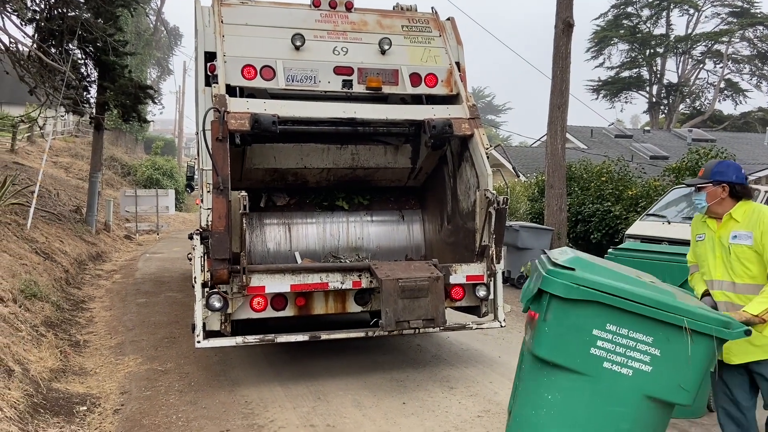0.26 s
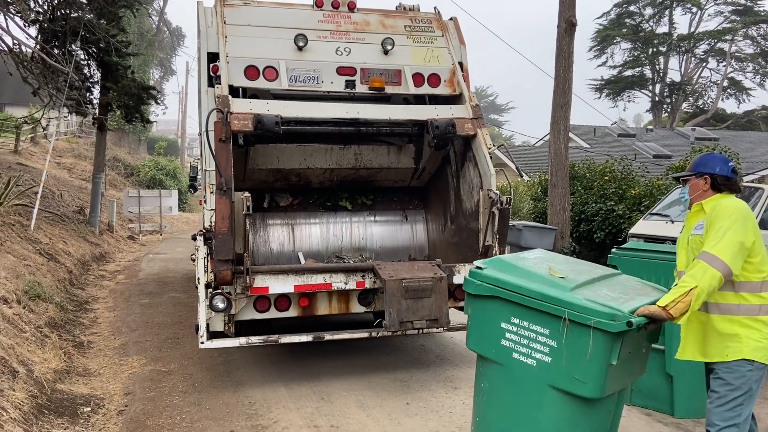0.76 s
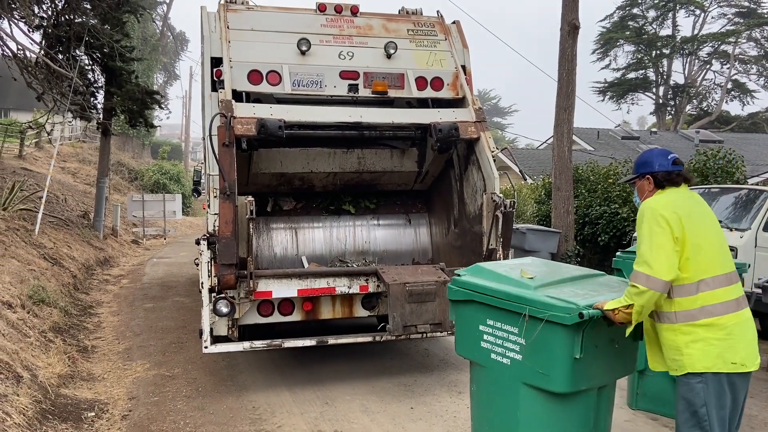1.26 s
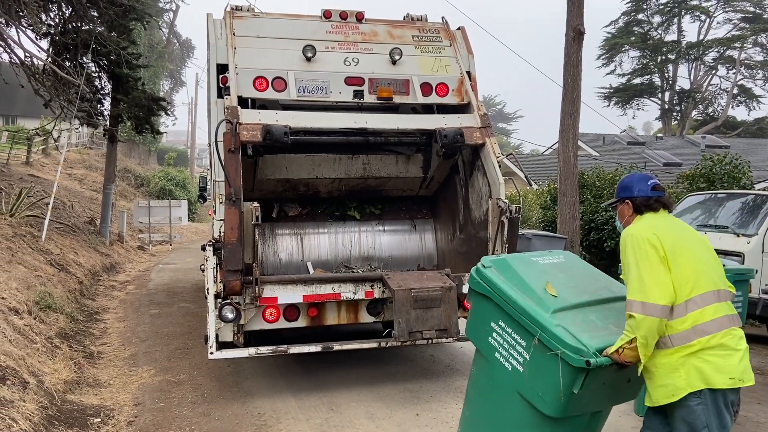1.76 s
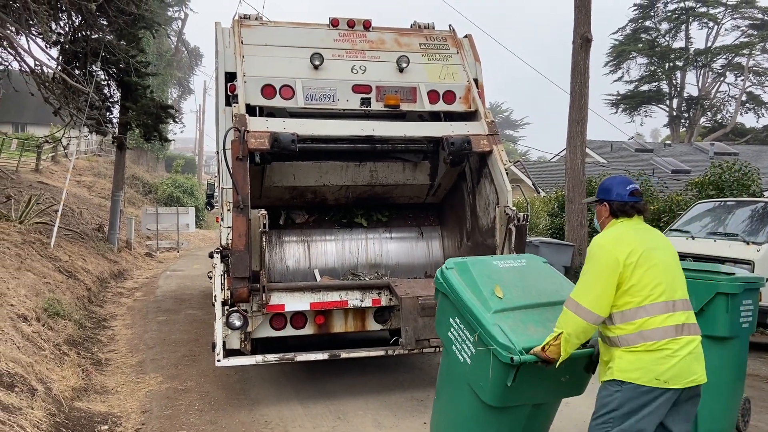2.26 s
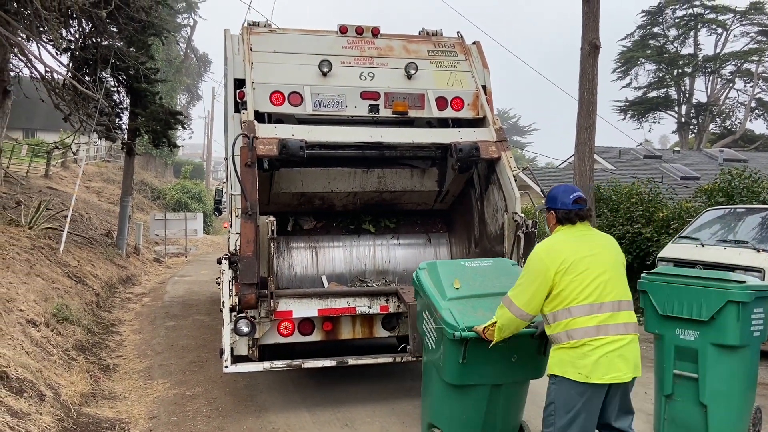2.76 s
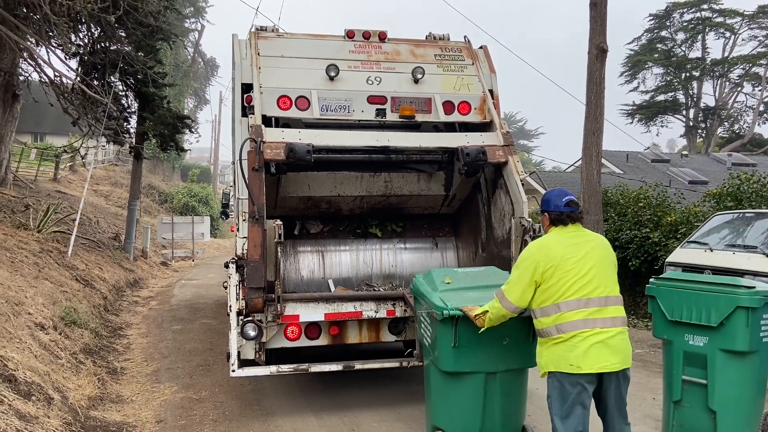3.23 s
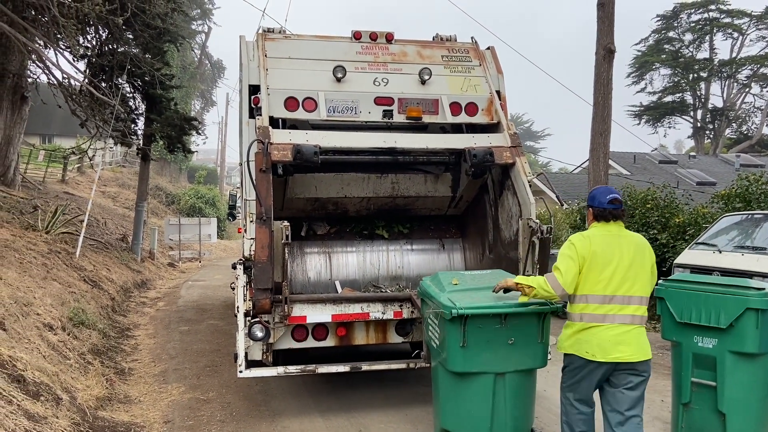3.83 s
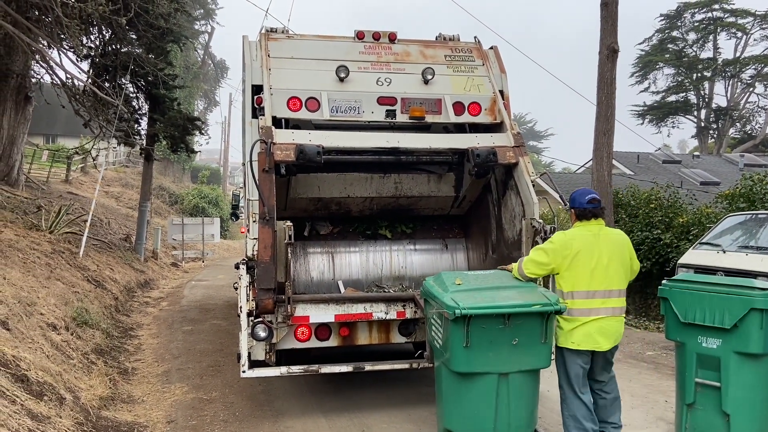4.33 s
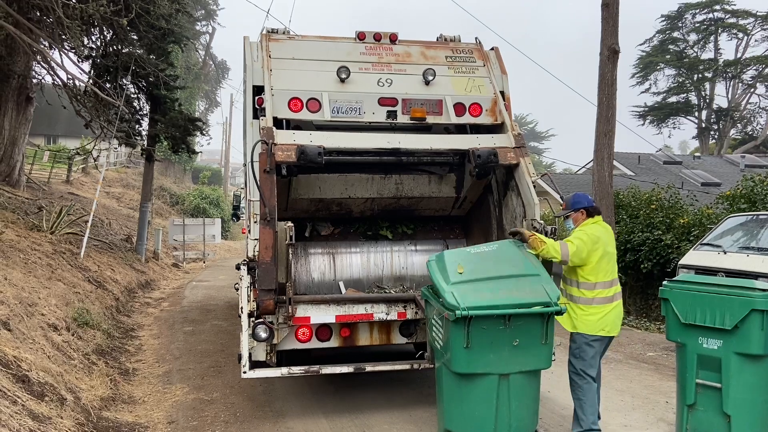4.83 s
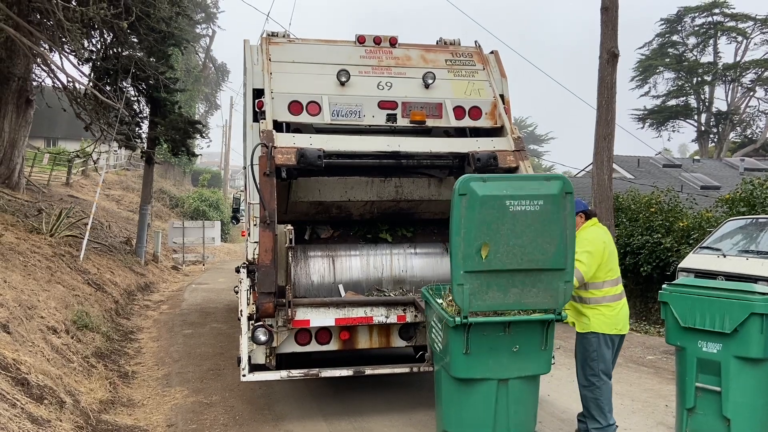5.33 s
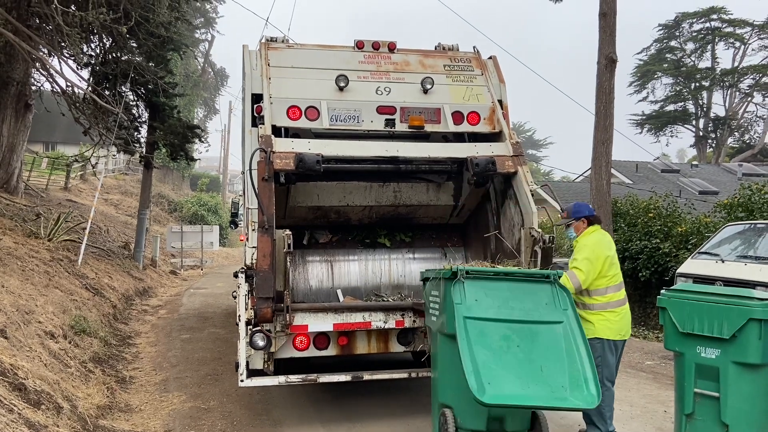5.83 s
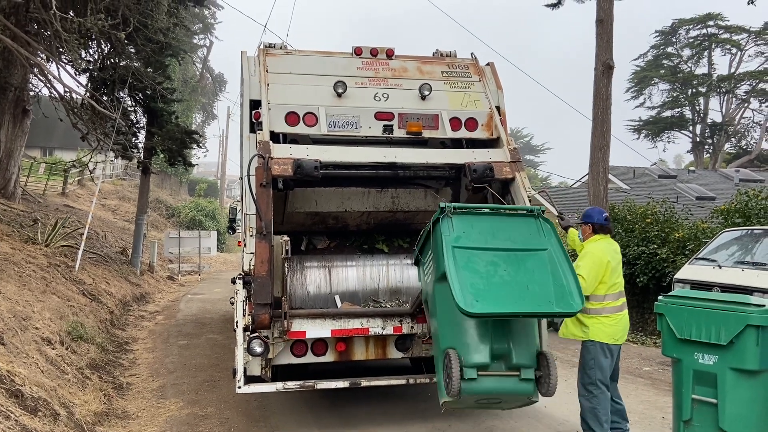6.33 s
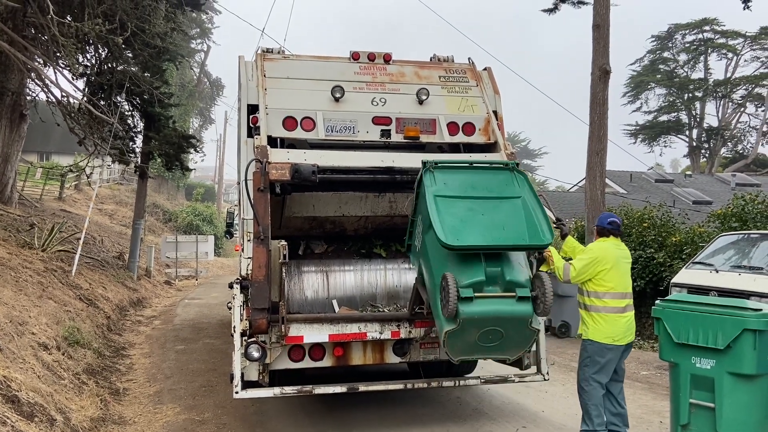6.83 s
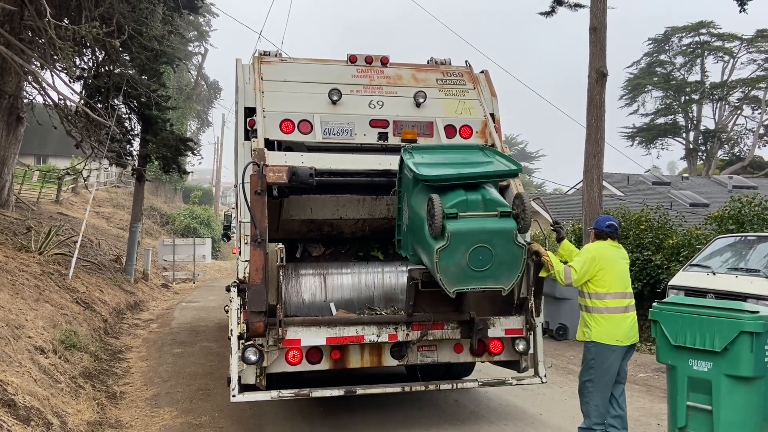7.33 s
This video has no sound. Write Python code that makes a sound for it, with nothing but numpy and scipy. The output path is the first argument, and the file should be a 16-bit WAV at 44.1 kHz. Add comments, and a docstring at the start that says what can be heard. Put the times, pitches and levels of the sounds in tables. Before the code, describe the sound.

A garbage truck's diesel idles throughout with low throb, clattering knock and fan noise. Close by, a plastic cart is rolled over grit with sharp snaps, then bumps hollowly against the truck. Its lid flips with light taps and slaps loudly on its back. A steel lifter clanks and bounces, the load knocks twice, and air bursts out with a squealing hiss. Outdoor street, stereo microphone a few metres back, short echo.

```python
"""A six-cylinder diesel idles in a street while a plastic cart is wheeled over grit to a garbage truck's tail.
The engine is shaped noise fired per cylinder plus tones; the grit is scattered noise grains and single snaps.
The cart bumps the truck and its lid slaps its back; then the steel lifter clanks: ringing modes over noise bursts.
Oil hisses, the load knocks hollowly twice, and a valve lets out air: shaped noise with whistles and squeals.
The street adds a decaying noise echo, and a limiter holds the level down after the loudest peaks."""
import sys
import numpy as np
from scipy import signal
from scipy.fft import rfft, irfft, next_fast_len
from scipy.io import wavfile
from scipy.ndimage import uniform_filter1d, minimum_filter1d, map_coordinates

SR = 44100
rng = np.random.default_rng(int(sys.argv[2]) if len(sys.argv) > 2 else 0)


def digitize_waveform(pressure):
    """Quantize a signal to 16-bit integers and store it at the path in sys.argv[1].

    Rows of a 2-D input are taken as channels; values are limited to [-1, 1].
    """
    field = np.atleast_2d(pressure).T
    bounded = np.clip(field, -1, 1)
    quanta = np.round(bounded * 32767).astype(np.int16)
    wavfile.write(sys.argv[1], SR, quanta)


N = 334278
TIME = np.arange(N) / SR
AGE = TIME[:SR // 2]  # seconds since a contact

# All noise spectra below are relative: (frequency [Hz], level [dB per Hz])

# Unequal knock of the six cylinders, in firing order: (level [dB])
CYLINDER_LEVELS = [3, -1, 4, 0, -5, 0]
# Engine and pump tones, mean level before a slow waver: (multiple of cycle rate [1], level [dB])
ENGINE_TONES = [(6, -47.5), (12, -36.5), (13, -42.5), (14, -42.5), (18, -39.5), (22.6, -38), (31, -46),
                (39.85, -42), (56, -49), (60, -51.5), (79.7, -51.5), (127, -54.5), (171, -56.5),
                (213.4, -55)]
# Engine loudness before the trims in engine(): (time [s], exhaust [dB], clatter [dB], pump [dB])
IDLE_LEVELS = [(0, -32.5, -37, -58.5), (2.2, -33.5, -36.5, -56.5), (3.6, -33.5, -37.5, -59.5),
               (6.2, -29.5, -36, -57.5), (7.58, -30.5, -34.5, -57)]
# Spectrum of the exhaust throb: (frequency [Hz], level [dB per Hz])
EXHAUST_SPECTRUM = [(20, -45), (32, -11), (47, -14), (60, 0.5), (105, 0.5), (140, -2.5), (290, -2.5),
                    (370, -11), (480, -17.5), (800, -23), (2000, -80)]
# Spectrum of the diesel knock: (frequency [Hz], level [dB per Hz])
CLATTER_SPECTRUM = [(250, -26), (500, -15), (650, -1), (740, -7), (860, 3), (1000, -3), (1250, -9),
                    (1700, -26), (2030, -18), (2500, -21), (5000, -35), (16000, -52)]
# Spectrum of the cooling fan: (frequency [Hz], level [dB per Hz])
FAN_SPECTRUM = [(200, -7), (500, -6.5), (850, 1), (1200, -4), (1700, -11), (3000, -15), (4200, -17.5),
                (5200, -26.5), (7000, -25), (11000, -38), (16000, -37)]
# Spectrum of a loose panel: (frequency [Hz], level [dB per Hz])
RATTLE_SPECTRUM = [(1100, -7), (1500, 17), (2030, 10), (2400, 5), (3200, -35), (8000, -70)]
# Spectrum of the hydraulic pump: (frequency [Hz], level [dB per Hz])
PUMP_SPECTRUM = [(2900, -30), (3450, -3), (3780, 10), (4050, -3), (4250, -2), (4370, 7), (4550, -8),
                 (5000, -27), (9000, -72)]
CYCLE_HZ = 5
KNOCK_DB, FAN_DB, CLATTER_TRIM_DB = -1, 1.2, -4.5  # knock and fan re the trimmed clatter level
KNOCK_JITTER_S = 0.002
PUMP_PULSE_DB, PUMP_WAVER_DB, TONE_WAVER_DB, THROB_WAVER_DB = 6.1, 2.6, 1.5, 1.2

# The cart is pushed along: (start [s], end [s], drumming [dB], grit [dB])
PUSHES = [(0, 0.837, -41.5, -51.5), (1.613, 1.997, -32, -50.5), (2.134, 2.478, -31, -52),
          (2.9, 3.4, -29, -61)]
# Loudest grit snaps under wheels and boots, before a 3 dB cut: (time [s], level [dB], stone pitch [Hz])
SNAPS = [(.0586, -21.5, 5000), (0.092, -23.5, 5000), (0.262, -33, 7000), (.2992, -37, 7000),
         (0.3418, -29, 7000), (0.475, -31, 7000), (.6365, -33, 7000), (0.8192, -22, 7000),
         (0.848, -33, 7000), (0.8696, -17.5, 5500), (1.6062, -16, 5000), (1.763, -27, 6000),
         (1.8153, -40, 5040), (1.8365, -13.5, 5530), (1.8909, -3, 5050), (1.903, -14, 5200),
         (1.9602, -21.5, 5400), (1.9875, -21.5, 2980), (2.106, -21, 4930), (2.115, -19.5, 4500),
         (2.1624, -10.5, 4000), (2.176, -8.5, 3500), (2.196, -12.5, 4500), (2.2153, -16.5, 5500),
         (2.2582, -16.5, 4500), (2.437, -11, 4500), (2.636, -19.5, 6960), (2.673, -21, 6040),
         (2.7593, -26, 6000), (2.803, -30, 7000), (2.8168, -9, 3930), (2.893, -13.5, 4500),
         (2.9266, -25, 7000), (4.735, -32.5, 4800), (6.019, -16, 2500)]
# Spectrum of crushed grit: (frequency [Hz], level [dB per Hz])
GRIT_SPECTRUM = [(600, -16), (2000, 6.5), (3500, 4.5), (5000, 5.5), (7200, 3), (11000, -1), (16000, -8)]
PUSH_RISE_S, PUSH_FALL_S = 0.04, 0.45
GRAINS_PER_S, GRAIN_SPREAD_DB, GRAIN_T60_S = 26, 5.5, 0.007  # the rate is for each timbre of stone
DRUM_WAVER_DB, GRIT_PATCHY_DB = 3.0, 4.5
SNAP_T60_S, STONE_DB, STONE_T60_S = 0.013, -13, 0.04  # dry click; stone's ring re the click

# Knocks on the cart's body, rim and lid; parts of a blow stretch or shorten the t60:
# (time [s], shell [dB], thud re shell [dB], crack re shell [dB], struck-spot pitch [Hz], t60 [s])
CART_KNOCKS = [(.06, -21.5, 5, -19, 282, 0.054), (0.8823, -11, 1, -1, 1410, 0.014),
               (1.757, -26.5, 9, -12, 255, 0.069), (1.8905, -22.5, -18, -6, 2080, 0.044),
               (2.177, -28, 3, -5, 693, 0.083), (2.197, -27, 3, -8, 720, 0.059),
               (2.264, -29, 7, -4, 870, 0.089), (2.294, -27.5, 3, -9, 1700, 0.094),
               (2.34, -30.5, 11.5, -27, 756, 0.14), (2.372, -31, 7.5, -13, 760, 0.14),
               (2.608, -33, 6, -33, 230, .12), (2.938, -20, 6.5, -20, 592, 0.13),
               (2.944, -25, -8, -18, 1290, 0.043), (2.986, -19, 1, -7, 1410, 0.085),
               (2.993, -14.5, 1, -12, 692, 0.1), (3.012, -16, -5, -11, 807, .11),
               (3.034, -19.5, 12, 2.5, 1530, 0.057), (3.061, -15.5, 3, -25, 703, 0.078),
               (3.088, -24.5, -10, -22, 810, 0.14), (3.141, -26.5, -16, -9, 699, 0.11),
               (3.301, -26.5, 4, -3, 1014, 0.085), (3.324, -22, 3.5, -7, 1000, 0.12),
               (4.995, -29, -30, -4, 2000, 0.048), (5.314, -27, 8, -10, 500, .12),
               (5.323, -26, 4, -5, 1100, .12), (5.339, -25, 10, -16, 660, 0.11),
               (5.39, -28.5, 5, -11, 1470, 0.13), (5.424, -24.5, 2, -13, 405, 0.11),
               (5.444, -31, 7, -18, 404, 0.13), (5.591, -22, -7, 1, 826, 0.1),
               (5.606, -17.5, -7, -8.5, 789, .15), (5.616, -28, -6, -11, 1750, .07),
               (5.634, -29.5, 9.5, 1, 780, 0.12), (5.742, -26, -14, -25, 1355, .058),
               (5.744, -24, -22, -28, 1880, 0.046), (5.9448, -6.5, -7, -2.5, 983, 0.069),
               (5.9496, 0, -5, -9, 467, 0.032), (5.955, -5.5, -1.5, -1, 790, .045),
               (5.965, -17.5, -6, -10, 677, 0.24)]
# Modes of the plastic cart, before scatter and contact damping: (frequency [Hz], relative level [dB], t60 [s])
PLASTIC_MODES = [(218, 0, 0.34), (294.4, -0.5, 0.75), (376, 4.5, 0.2), (535, -1.5, 0.22), (673, -5, 0.31),
                 (767.4, 1.5, 0.32), (858, 0.5, 0.15), (921, -6, .3), (1030, -7, .19), (1242, -4.5, 0.088),
                 (1572, -7.5, 0.4), (1702, -14, 0.16), (2078, -6, 0.099), (2380, -15.5, 0.084)]
# Spectrum of a hollow body's low thud: (frequency [Hz], level [dB per Hz])
THUD_SPECTRUM = [(25, -32), (55, 2.5), (80, -2), (125, -3.5), (220, -7), (370, -11), (520, -24.5),
                 (1500, -57)]
# Spectrum of a wall's dense wash: (frequency [Hz], level [dB per Hz])
SHELL_SPECTRUM = [(120, -7), (220, -8.5), (520, 1), (800, 0), (1200, -3.5), (2000, -10.5), (3000, -24.5),
                  (6000, -29), (16000, -53)]
# Spectrum of the crack at contact, before the force tilt: (frequency [Hz], level [dB per Hz])
CRACK_SPECTRUM = [(900, -13), (2200, 12), (5000, 2.5), (7500, 0.5), (11000, -6), (16000, -14)]
ATTACK_SHARE = 0.014  # contacts that ring long also rise slowly: share of the t60
MODES_DB, MODE_SCATTER_DB = -3, 2
SPOT_RING_DB, SPOT_NOISE_DB = -1, -4
CART_WASH_DB, ARM_WASH_DB = -2, -2
WASH_TAIL_DB, WASH_TAIL_TIMES = -11, 3  # a dense tail that lasts this many times the contact's t60
BOOM_HZ, BOOM_DB, BOOM_PEAK_SHARE = 76.4, -3, 0.18  # air inside swells late, at this share of the t60

# Decay of the street's echo: (frequency [Hz], t60 [s])
STREET_DECAY = [(100, 0.78), (800, 0.33), (4000, 0.27), (14000, 0.14)]
# Width of the echo: (frequency [Hz], side over middle [ratio])
ECHO_WIDTH = [(100, .25), (800, .5), (3000, .9), (12000, .9)]
STREET_DB = -13.5

# Faint thin hisses that swell and fade: (time [s], level [dB], width [s])
SEEPS = [(4.14, -51, .11), (4.72, -51, .05)]
# Spectrum of the open valve's hiss: (frequency [Hz], level [dB per Hz])
AIR_SPECTRUM = [(800, -2.5), (2000, -11), (4000, -11), (5600, -10.5), (7100, -6.5), (8300, -12),
                (11000, -17.5), (16000, -18)]
# Resonances of the valve's nozzle: (frequency [Hz], width [Hz], relative level [dB])
NOZZLE = [(2920, 77, -6), (3130, 68, -3), (3750, 65, -5), (4070, 130, -2), (4750, 140, -5), (5060, 70, -1),
          (6150, 120, -5), (6900, 170, 1), (7200, 80, -6), (8000, 48, 0)]
# Squeals of the valve, relative to each other: (frequency [Hz], level [dB])
SQUEALS = [(3078, -4), (3341, -2), (3780, -3), (4122, -1), (4648, 0), (5077, 1), (5123, -2), (6546, 2),
           (6851, -3), (7016, -3)]
VALVE_OPENS_S, VALVE_RISE_S, VALVE_SETTLES_S = 7.393, 0.028, 0.12
VALVE_DB, VALVE_SURGE_DB = -29.5, 6  # settled flow, and the surge above it on opening
WHISTLE_DB, SQUEAL_DB = -4, -18.5  # both re the flow
SQUEAL_WAVER_DB, SQUEAL_DRIFT_HZ = 3, 11

# The lifter takes up its slack and clanks: (time [s], level [dB], slack [s], struck-spot pitch [Hz])
CLANKS = [(6.58, -6, 0.0084, 788), (6.919, -16.5, 0.017, 725), (7.14, -28.5, .03, 1127)]
# Modes of the steel lifter, before scatter and contact damping: (frequency [Hz], relative level [dB], t60 [s])
STEEL_MODES = [(230.3, 2, .55), (379.5, -0.5, 1), (530, -9, 0.27), (617, -1, 0.2), (805, 0.5, 0.23),
               (893, 1, 0.22), (1003, -3, .26), (1217, 2, .19), (1280, -3, 0.23), (1410, -3, .32),
               (1570, -1, .18), (1790, -3, 0.18), (1975, -2, 0.14), (2740, -13, 0.13)]
# Spectrum of oil hissing through the lifter's valve: (frequency [Hz], level [dB per Hz])
OIL_SPECTRUM = [(1500, -13), (4000, -4), (7000, 5), (12000, -7), (16000, -17)]
LIFT_STARTS_S, LIFT_RISE_S, OIL_DB = 6.17, 0.14, -56
ARM_T60_S, ARM_THUD_DB = 0.13, -5
TICK_DB, TICK_CRACK_DB, CLANK_CRACK_DB = -8, -2, -20  # first touch re the clank; crack re ring of each
BOUNCE_S, BOUNCE_LOSS_DB, BOUNCE_CRACK_DB = 0.041, 11, -6  # the arm chatters after a clank
LIGHT_PITCH = 1.67  # light touches ring this many times higher than the full clank

# Pitches that make up two hollow knocks as the load shifts in the upturned cart:
# (time [s], level [dB], hollow pitch [Hz], t60 [s])
TUMBLE_PITCHES = [(7.421, -22.5, 1610, .04), (7.422, -10, 842, 0.048), (7.488, -14, 2055, 0.048),
                  (7.490, -16.5, 1390, 0.046), (7.4918, -11.5, 887, 0.084)]
TUMBLE_RING_DB = -3.5  # the clean ring re its noisy part

# Level difference between the microphone ports: (frequency [Hz], left minus right [dB])
PORT_LEVEL = [(60, 2), (300, 1.4), (1000, 1.7), (2400, 2.5), (5500, 3.3), (10000, 0), (15000, -.5)]
# Phase difference between the microphone ports: (frequency [Hz], left lead [rad])
PORT_PHASE = [(20, 0), (1500, 0), (3100, .55), (5600, -.3), (6300, .1), (7200, 0), (8950, -3.1),
              (11000, -6.2), (13250, -9.4), (15500, -12.7)]
CLIP_TOP, TOP_HZ = 0.97, 16000  # full scale is 1


def amp(db):
    """Decibels to gain."""
    return 10 ** (np.asarray(db) / 20)


def unit(x):
    """Scale to rms 1."""
    return x / np.sqrt(np.mean(x ** 2) + 1e-20)


def along(points, hz):
    """(Hz, value) points read on a log frequency axis."""
    f, v = np.transpose(points)
    return np.interp(np.log(hz + 1), np.log(f + 1), v)


def curves(rows):
    """One value per sample for each column after the time."""
    s, *columns = np.transpose(rows)
    return [np.interp(TIME, s, column) for column in columns]


def wobble(rate):
    """A smooth random curve, rate knots a second."""
    knots = rng.standard_normal(int(N * rate / SR) + 4)
    return map_coordinates(knots, [TIME * rate])


def filtered(x, response):
    """x times a response of frequency, padded so that its end does not wrap round."""
    n = x.shape[-1]
    m = next_fast_len(n + SR // 10)
    hz = np.fft.rfftfreq(m, 1 / SR)
    return irfft(rfft(x, m) * response(hz), m)[..., :n]


def coloured(x, spectrum):
    """x with a (Hz, dB) spectrum, at rms 1."""
    return unit(filtered(x, lambda hz: amp(along(spectrum, hz))))


def hiss(spectrum):
    """Steady coloured noise, as long as the scene."""
    return coloured(rng.standard_normal(N), spectrum)


def fade(t60):
    """A decay that loses 60 dB in t60."""
    return np.exp(-np.log(1000) * AGE / max(t60, 1e-3))


def onset(attack):
    """An exponential rise with this time constant in seconds."""
    return 1 - np.exp(-AGE / attack)


def sine(hz):
    """A pure tone at rms 1 over one contact."""
    return np.sqrt(2) * np.sin(2 * np.pi * hz * AGE)


def burst(spectrum, t60, attack):
    """Dense modes struck together: coloured noise that rises and dies."""
    return coloured(rng.standard_normal(len(AGE)), spectrum) * fade(t60) * onset(attack)


def add(track, s, sound):
    """Mix a sound into a track at time s."""
    part = track[max(round(s * SR), 0):][:len(sound)]
    part += sound[:len(part)]


def gate(start, end, rise, fall):
    """Attack, hold and release."""
    return np.clip((TIME - start) / rise, 0, 1) * np.clip(1 - (TIME - end) / fall, 0, 1)


def once_a_cycle(at, width):
    """A smooth swell of the given width in seconds at one moment of every engine cycle."""
    offset = ((TIME - at) * CYCLE_HZ + 0.5) % 1 - 0.5
    return np.exp(-0.5 * (offset / CYCLE_HZ / width) ** 2)


def firings(first, t60, fresh, scatter_db, pattern, jitter=0):
    """Each cylinder repeats its own noise burst once a cycle, with a part that is new every time."""
    count = len(CYLINDER_LEVELS)
    track, size = np.zeros(N), SR // 10
    own = rng.standard_normal((count, size))
    shape = (fade(t60) * onset(0.006))[:size]
    for k in range(int(N / SR * CYCLE_HZ * count)):
        sound = (own[k % count] + fresh * rng.standard_normal(size)) * shape
        level_db = pattern * CYLINDER_LEVELS[k % count] + scatter_db * rng.normal()
        at = first + k / (CYCLE_HZ * count) + jitter * rng.normal()
        add(track, at, sound * amp(level_db))
    return track


def engine():
    """Exhaust throb, diesel knock, steady tones and fan; a loose panel and the pump pulse with each cycle."""
    exhaust_db, clatter_db, pump_db = curves(IDLE_LEVELS)
    throb = firings(first=0.002785, t60=0.23, fresh=0.35, scatter_db=1.5, pattern=0.016)
    exhaust = amp(exhaust_db + THROB_WAVER_DB * wobble(20)) * coloured(throb, EXHAUST_SPECTRUM)

    strokes = firings(first=0.01, t60=0.07, fresh=0.35, scatter_db=1, pattern=1, jitter=KNOCK_JITTER_S)
    knock = coloured(strokes, CLATTER_SPECTRUM)
    # half the fan's noise power is shared by both sides, half is separate
    fan = coloured(rng.standard_normal(N) + rng.standard_normal((2, N)), FAN_SPECTRUM)
    clatter = amp(clatter_db + CLATTER_TRIM_DB) * (amp(KNOCK_DB) * knock + amp(FAN_DB) * fan)

    shakes = amp(-43) * once_a_cycle(at=0.018, width=0.011) + amp(-48) * once_a_cycle(at=0.115, width=0.009)
    rattle = shakes * hiss(RATTLE_SPECTRUM)
    pulse_db = PUMP_PULSE_DB * once_a_cycle(at=0.084, width=0.0098)
    pump = amp(pump_db + pulse_db + PUMP_WAVER_DB * wobble(4.4)) * hiss(PUMP_SPECTRUM)

    turns = CYCLE_HZ * (TIME + 0.00022 * wobble(1.94))  # the idle speed wanders a little
    tones = np.zeros(N)
    for multiple, db in ENGINE_TONES:
        tone = np.sqrt(2) * np.sin(2 * np.pi * (multiple * turns + rng.random()))
        tones += amp(db + TONE_WAVER_DB * wobble(5.4)) * tone
    return tones + pump + rattle + exhaust + clatter


def snap(stone_hz):
    """A stone cracks under a load: a dry click and a short ring at its own pitch."""
    pitch = [(stone_hz / 2, -18), (stone_hz * 0.8, -10), (stone_hz, 0),
             (stone_hz * 1.25, -10), (stone_hz * 2, -16)]
    click = burst(GRIT_SPECTRUM, SNAP_T60_S, attack=0.0001)
    return click + amp(STONE_DB) * burst(pitch, STONE_T60_S, attack=0.0003)


def wheels(timbres=5):
    """Pushed wheels drum the hollow body and crush grit: loud snaps among small stones of several timbres."""
    drumming, crushing = np.zeros(N), np.zeros(N)
    for start, end, drum_db, grit_db in PUSHES:
        push = gate(start, end, PUSH_RISE_S, PUSH_FALL_S)
        drumming += amp(drum_db) * push
        crushing += amp(grit_db) * push
    drum = hiss(THUD_SPECTRUM) + amp(-13) * hiss(SHELL_SPECTRUM)

    happens = rng.random((timbres, N)) < GRAINS_PER_S / SR
    spread = np.minimum(rng.standard_normal((timbres, N)), 2)  # no grain is extremely loud
    grains = happens * amp(GRAIN_SPREAD_DB * spread)
    stones = rng.standard_normal((timbres, len(AGE))) * fade(GRAIN_T60_S)
    patter = signal.fftconvolve(grains, stones, axes=1).sum(axis=0)[:N]
    crunch = coloured(patter * amp(GRIT_PATCHY_DB * wobble(9.36)), GRIT_SPECTRUM)

    track = drumming * amp(DRUM_WAVER_DB * wobble(30.1)) * drum + crushing * crunch
    for s, db, stone_hz in SNAPS:
        add(track, s, amp(db - 3) * snap(stone_hz))
    return track


def ringing_modes(modes):
    """The wall's own resonances, each with its own decay, in slightly new tuning and balance every time."""
    strengths = amp(np.array(modes)[:, 1] + rng.normal(0, MODE_SCATTER_DB, len(modes)))
    strengths /= np.linalg.norm(strengths)
    ring = np.zeros(len(AGE))
    for strength, (hz, _, life) in zip(strengths, modes):
        tuned_hz = hz * rng.normal(1, 0.0058)
        ring += strength * np.sin(2 * np.pi * (tuned_hz * AGE + rng.random())) * fade(life)
    return ring


def blow(modes, db, thud_db, crack_db, spot_hz, t60, wash_db):
    """One contact: wall modes and struck spot ring over a dense wash, with a crack and a late hollow boom."""
    attack = max(ATTACK_SHARE * t60, 1e-4)
    ring = ringing_modes(modes) * fade(4.7 * t60) * onset(attack)
    pitch = [(spot_hz / 2, -35), (spot_hz * 0.8, -11), (spot_hz, 0),
             (spot_hz * 1.25, -11), (spot_hz * 2, -35), (spot_hz * 6, -80)]
    spot_noise = burst(pitch, t60, attack)
    spot_ring = sine(spot_hz) * fade(0.64 * t60) * onset(attack)
    wash = amp(wash_db) * burst(SHELL_SPECTRUM, t60, attack)
    wash += amp(WASH_TAIL_DB) * burst(SHELL_SPECTRUM, WASH_TAIL_TIMES * t60, 3 * attack)
    body = amp(MODES_DB) * ring + amp(SPOT_NOISE_DB) * spot_noise + amp(SPOT_RING_DB) * spot_ring + wash

    swell = AGE / (BOOM_PEAK_SHARE * t60)
    boom = np.sin(2 * np.pi * (BOOM_HZ * AGE + rng.random())) * (swell * np.exp(1 - swell)) ** 2
    thud = amp(BOOM_DB) * boom + amp(0.5) * burst(THUD_SPECTRUM, 1.35 * t60, attack=0.0032)

    # dB per octave: a harder blow is a shorter contact, so brighter
    tilt_db = np.clip(0.13 * (db + crack_db + 19.0), -3, 3)
    low_hz = CRACK_SPECTRUM[0][0]
    bright = [(hz, level + tilt_db * np.log2(hz / low_hz)) for hz, level in CRACK_SPECTRUM]
    crack = burst(bright, 0.83 * t60, attack / 2)
    return amp(db) * (body + amp(thud_db) * thud + amp(crack_db) * crack)


def cart():
    """The plastic cart jolts over the road, bumps the truck, and its lid is flung back: blows on its modes."""
    track = np.zeros(N)
    for s, db, thud_db, crack_db, spot_hz, t60 in CART_KNOCKS:
        add(track, s, blow(PLASTIC_MODES, db, thud_db, crack_db, spot_hz, t60, CART_WASH_DB))
    return track


def street(x):
    """Hopper, bank and houses answer with a decaying noise tail, wider in the treble."""
    hz, t, noise = signal.stft(rng.standard_normal((2, SR // 2)), SR, nperseg=256)
    decay = np.exp(-np.log(1000) * t / along(STREET_DECAY, hz)[:, None])
    mid, side = signal.istft(noise * decay, SR, nperseg=256)[1]
    side = filtered(side, lambda f: along(ECHO_WIDTH, f))
    tail = np.array([mid + side, mid - side]) / np.linalg.norm(mid)
    delayed = np.pad(tail, ((0, 0), (SR // 150, 0)))  # the answer starts 1/150 s late
    return signal.fftconvolve(x[None], delayed, axes=1)[:, :N]


def squeal(hz):
    """A narrow tone that wavers in pitch and strength."""
    turns = np.cumsum(hz + SQUEAL_DRIFT_HZ * wobble(60)) / SR
    return np.sqrt(2) * np.sin(2 * np.pi * turns) * amp(SQUEAL_WAVER_DB * wobble(35))


def nozzle(f):
    """Response of the nozzle: a sum of narrow resonances."""
    return sum(amp(db) * 1j * f * width / (centre ** 2 - f ** 2 + 1j * f * width)
               for centre, width, db in NOZZLE)


def air():
    """Compressed air seeps faintly, then surges through a valve that whistles and squeals at many pitches."""
    swells = sum(amp(db) * np.exp(-np.abs(TIME - s) / width) for s, db, width in SEEPS)
    seep = swells * hiss([(4000, -2), (7000, -4), (12000, -5), (16000, -14)])

    whistle = amp(WHISTLE_DB) * unit(filtered(rng.standard_normal(N), nozzle))
    squeals = sum(amp(SQUEAL_DB + db) * squeal(hz) for hz, db in SQUEALS)
    rush = amp(-0.5 + 1.5 * wobble(70)) * hiss(AIR_SPECTRUM)

    open_s = np.maximum(TIME - VALVE_OPENS_S, 0)
    surge_db = VALVE_SURGE_DB * np.exp(-open_s / VALVE_SETTLES_S)
    flow = np.minimum(open_s / VALVE_RISE_S, 1) * amp(VALVE_DB + surge_db)
    return seep + flow * (rush + whistle + squeals)


def lifter(bounces=2):
    """Driven by hissing oil, the steel arm ticks as it takes up slack, clanks, and bounces ever more weakly."""
    track = amp(OIL_DB) * np.clip((TIME - LIFT_STARTS_S) / LIFT_RISE_S, 0, 1) * hiss(OIL_SPECTRUM)
    for s, db, slack_s, spot_hz in CLANKS:
        light_hz = LIGHT_PITCH * spot_hz
        contacts = [(s - slack_s, db + TICK_DB, TICK_CRACK_DB, light_hz), (s, db, CLANK_CRACK_DB, spot_hz)]
        for k in range(1, bounces + 1):
            contacts.append((s + k * BOUNCE_S, db - k * BOUNCE_LOSS_DB, BOUNCE_CRACK_DB, light_hz))
        for at, contact_db, crack_db, hz in contacts:
            add(track, at, blow(STEEL_MODES, contact_db, ARM_THUD_DB, crack_db, hz, ARM_T60_S, ARM_WASH_DB))
    return track


def tumbles():
    """Two short hollow knocks of the load, each a sum of noise bands and sines at several pitches."""
    track = np.zeros(N)
    for s, db, hz, t60 in TUMBLE_PITCHES:
        band = [(hz / 8, -24), (hz / 2, -20), (hz * 0.8, -9), (hz, 0),
                (hz * 1.25, -10), (hz * 2, -26), (hz * 6, -60)]
        noisy = burst(band, t60, attack=0.002)
        ring = sine(hz) * fade(t60) * onset(0.0022)
        add(track, s, amp(db) * (noisy + amp(TUMBLE_RING_DB) * ring))
    return track


def scene():
    """All sources reach two microphone ports that differ in level and, in the treble, in phase."""
    work = wheels() + cart() + air() + lifter() + tumbles()
    sides = np.array([[1], [-1]]) / 2  # each port takes half the difference

    def ports(hz):
        return amp(sides * along(PORT_LEVEL, hz)) * np.exp(1j * sides * along(PORT_PHASE, hz))

    return filtered(engine() + work + amp(STREET_DB) * street(work), ports)


def limited(x, ceiling, hold, release):
    """The gain drops quickly for a peak, holds, then recovers; hold and release are in seconds."""
    need = np.minimum(1, ceiling / (np.abs(x).max(axis=0) + 1e-9))
    width = 2 * int(hold * SR / 2) + 1
    held = minimum_filter1d(need, width, origin=width // 2)
    pole = np.exp(-1 / (release * SR))
    recovering = 1 - signal.lfilter([1 - pole], [1, -pole], 1 - held)
    gain = np.minimum(held, recovering)
    smooth = uniform_filter1d(minimum_filter1d(gain, SR // 500), SR // 500)  # 2 ms, so no step clicks
    return x * smooth


def record(dry):
    """A limiter, the rounding of the peaks that pass it, and a band limit."""
    loud = limited(dry, ceiling=1.12, hold=0.18, release=0.07)
    rounded = loud / (1 + (loud / CLIP_TOP) ** 6) ** (1 / 6)
    return filtered(rounded, lambda hz: hz < TOP_HZ)


dry = scene()
out = record(dry)
digitize_waveform(out)
```